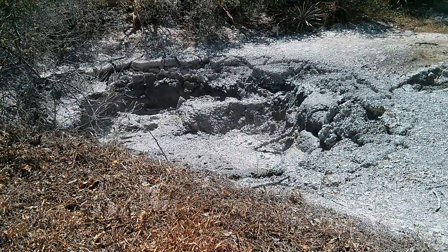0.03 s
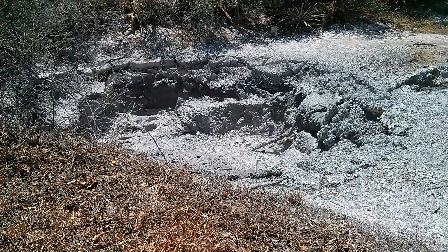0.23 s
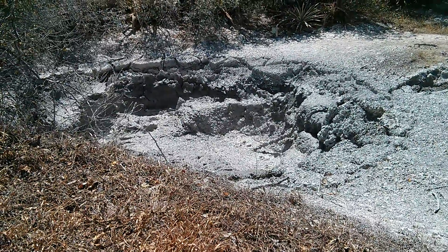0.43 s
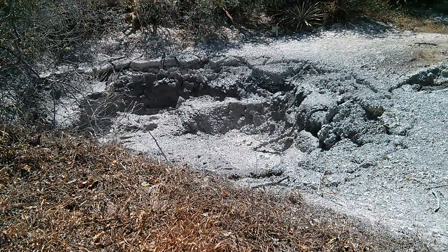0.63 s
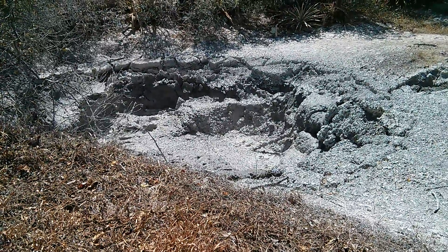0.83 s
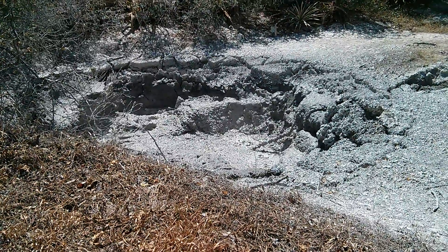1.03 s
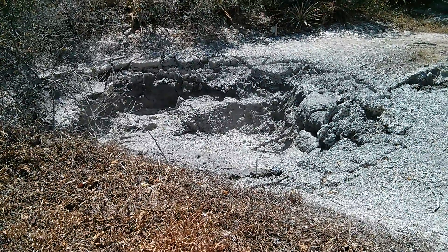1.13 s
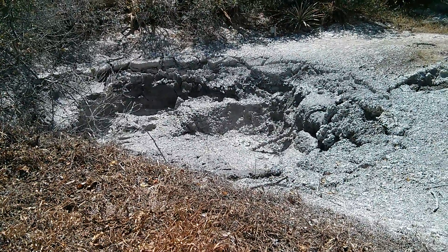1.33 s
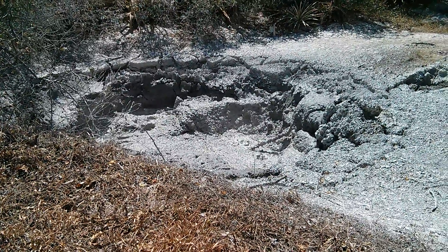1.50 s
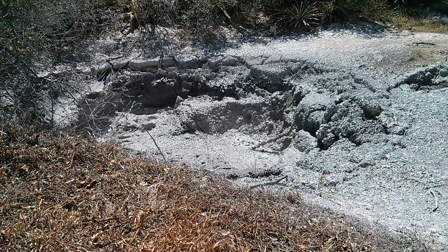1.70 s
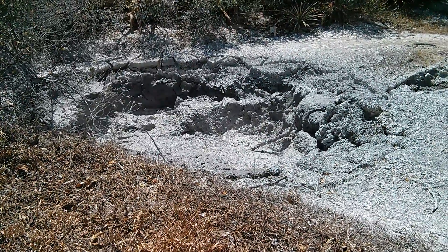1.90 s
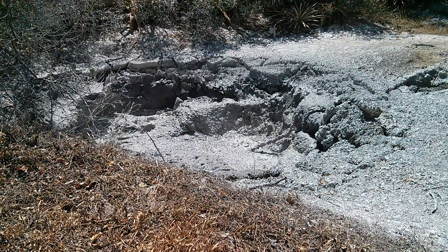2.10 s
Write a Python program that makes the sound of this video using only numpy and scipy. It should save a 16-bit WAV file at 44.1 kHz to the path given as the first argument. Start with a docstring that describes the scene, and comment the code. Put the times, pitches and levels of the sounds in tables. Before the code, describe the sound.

Boiling mud hisses with steam and simmers faintly outdoors. From 0.2 to 0.45 seconds a heavy cluster of low plops bursts with a hollow rumble, squelches and sharp splatter. A plop and pop follow near 0.78, then plops at 1.0 to 1.1 and a wet snap at 1.14. A faint upward slurp comes at 1.5, rounder plops at 1.7 and 1.85, and a small crisp spatter around 2.0 to 2.1.

```python
"""Boiling mud pit

Outdoors, with the microphone a few metres from the pit. Gas bubbles open with low plops, sines that mostly
glide up; wet films squelch as sliding tones and noise bands, and one snaps as a set of modes. A big burst early
on rings the vent with noise and clear tones, and throws a spray of random impacts. Steam is coloured noise,
hissing steadily and in puffs, over a simmer of small rising sines. The pit walls add a short echo."""
import sys
import numpy as np
from scipy import signal
from scipy.fft import rfft, irfft
from scipy.io import wavfile

SR = 44100
rng = np.random.default_rng(int(sys.argv[2]) if len(sys.argv) > 2 else 0)


def store_wav(level_fs):
    """Save 16-bit WAV to argv[1]."""
    pcm = np.round(np.clip(np.atleast_2d(level_fs), -1, 1) * 32767)
    wavfile.write(sys.argv[1], SR, pcm.T.astype(np.int16))


N = 94815
T = np.arange(N) / SR
GLIDE_S = 0.0137  # time constant of the pitch glide of plops and squelches


def undb(db):
    """Decibels to gain."""
    return 10 ** (np.asarray(db) / 20)


def unit(x):
    """Scale to rms 1."""
    return x / np.sqrt(np.mean(x ** 2))


def noise():
    """White noise, spread 1."""
    return rng.standard_normal(N)


def low_pass(x, order, hz):
    """Remove what lies above a corner frequency."""
    return signal.sosfilt(signal.butter(order, hz, fs=SR, output="sos"), x)


def colour(x, points):
    """Filter by a (hz, level_db) curve that falls 30 dB per octave beyond its ends; rms 1."""
    hz, db = np.array(points, float).T
    octave = np.log2(np.arange(N // 2 + 1) * SR / N + 1)
    below = np.maximum(np.log2(hz[0]) - octave, 0)
    above = np.maximum(octave - np.log2(hz[-1]), 0)
    gain = undb(np.interp(octave, np.log2(hz), db) - 30 * (below + above))
    return unit(irfft(rfft(x) * gain, N))


def ring(x, hz, width_hz):
    """One resonance, gain 1 at its centre."""
    return signal.lfilter(*signal.iirpeak(hz, hz / width_hz, fs=SR), x)


def envelope(start, swell, decay):
    """A rounded rise, then an exponential fall."""
    age = np.maximum(T - start, 0)
    rise = np.sin(np.pi / 2 * np.minimum(age / swell, 1))
    return rise * np.exp(-np.maximum(age - swell, 0) / decay)


def strength(events):
    """Envelopes of (start_s, level_db, swell_s, decay_s) rows, summed in power."""
    power = sum((undb(db) * envelope(start, swell, decay)) ** 2 for start, db, swell, decay in events)
    return np.sqrt(power)


def glide(start, from_hz, to_hz):
    """Phase of a cavity whose pitch settles exponentially from one value towards another."""
    age = np.maximum(T - start, 0)
    return 2 * np.pi * (to_hz * age + (from_hz - to_hz) * GLIDE_S * (1 - np.exp(-age / GLIDE_S)))


def wander(rate_hz):
    """Smooth chance with spread 1."""
    return unit(low_pass(noise(), 2, rate_hz))


def rasp(phase, width_hz):
    """A band of noise around a moving pitch; rms 1."""
    in_phase, quadrature = [unit(low_pass(noise(), 4, width_hz / 2)) for _ in range(2)]
    return in_phase * np.sin(phase) + quadrature * np.cos(phase)


def drops():
    """Dense droplet impacts of uneven size, at random moments."""
    drops_per_s, spread_db = 6400, 4
    hit = rng.random(N) < drops_per_s / SR
    size = undb(spread_db * np.minimum(rng.exponential(size=N), 2))
    return hit * noise() * size


def air():
    """Dull outdoor background: coloured noise whose level wavers slightly."""
    # spectrum of the open air: hz, level_db
    air_colour = [(25, 15), (50, -3.5), (90, 2), (140, -2), (220, -3.5), (310, 0.5), (430, -8.5),
                  (600, 0.5), (780, -10), (1000, -9.5), (1500, -9.5), (2250, -13.5), (2550, -18),
                  (2730, -36.5), (3200, -26.5)]
    level_db, waver_db, waver_hz = -53, 0.62, 12.5
    return undb(level_db) * colour(noise(), air_colour) * undb(waver_db * wander(waver_hz))


def steam():
    """Turbulent steam as noise: a steady, slightly flickering hiss that swells in puffs."""
    # spectrum of the steam: hz, level_db
    steam_colour = [(1650, -49), (2500, -23), (2800, -27), (3400, -32), (3600, -23.5), (4550, -17),
                    (4930, -17.5), (5690, -21.5), (6680, -9), (7600, -2), (8000, -1.5), (8540, -7),
                    (9050, -10.5), (10200, -6), (12200, -22), (13800, -22), (15100, -25), (15800, -21)]
    # steady hiss, ahead of the spray's colouring: time_s, level_db
    hiss_levels = [(0, -47.5), (.06, -52), (.14, -47.5), (.65, -53.5), (.95, -50), (1.05, -57),
                   (1.15, -48.5), (1.4, -51), (1.7, -52), (1.79, -54), (1.97, -54.5), (2.15, -46.5)]
    # puffs of steam, ahead of the spray's colouring: start_s, level_db, swell_s, decay_s
    puff_events = [(.16, -44, 0.14, 0.32), (.40, -36.5, 0.071, 0.038), (.72, -48, 0.083, 0.15),
                   (1.17, -62, 0.076, 0.049), (1.435, -52, .015, 0.036), (1.572, -43.5, 0.028, 0.04),
                   (1.812, -43, 0.033, 0.045), (2.008, -43.5, 0.026, 0.019), (2.09, -58, 0.015, .06)]
    flicker_db, flicker_hz = 1.0, 38
    steady = undb(np.interp(T, *np.array(hiss_levels).T))
    level = np.hypot(steady, strength(puff_events))
    return colour(noise(), steam_colour) * level * undb(flicker_db * wander(flicker_hz))


def simmer():
    """Small bubbles ring at random; the higher, the shorter, and above the middle pitch the quieter."""
    bubbles_per_s, middle_hz, range_octaves = 70, 502.7, 1.706  # range to either side
    level_db, range_db, tilt_db_per_octave = -55.5, 8, -6
    peak_cycles, rise_ratio = 2.4, 1.3  # cycles of starting pitch until loudest; final over starting pitch
    out, age = np.zeros(2 * N), T[:N // 16]
    for when, pitch, size in rng.random((int(bubbles_per_s * N / SR), 3)):
        octave = range_octaves * (2 * pitch - 1)
        hz = middle_hz * 2 ** octave
        life = age * hz / peak_cycles
        rising_hz = hz * (rise_ratio + (1 - rise_ratio) * np.exp(-life / 2))
        phase = 2 * np.pi * np.cumsum(rising_hz) / SR
        db = level_db + tilt_db_per_octave * max(octave, 0) + range_db * (2 * size - 1)
        i = int(when * N)
        out[i:i + len(age)] += undb(db) * life * np.exp(1 - life) * np.sin(phase)
    return out[:N]


def squelches():
    """Tearing films, and the vent's clear rings after gas bursts: a resonance that slides, mostly upward, from
    a clear ring to a rough rasp by event."""
    # wet films, and at .318-.344 s the vent ringing clearly after gas bursts: start_s, start_pitch_hz,
    # end_pitch_hz, level_db, swell_s, decay_s, roughness (0-1)
    squelch_events = [(.002, 540, 608, -45.5, 0.0063, 0.021, 0.74), (.072, 594, 676, -46.5, 0.013, 0.009, 0.6),
                      (.203, 550, 630, -44, 0.0026, 0.0054, 0.7), (.237, 650, 730, -34.5, 0.0039, 0.0054, 0.5),
                      (0.242, 1600, 1910, -42.5, 0.0024, 0.01, 0.95),
                      (.2515, 553, 742, -31.5, 0.0049, 0.014, 0.65), (0.285, 348, 413, -33, .002, 0.0034, 0.1),
                      (.318, 1182, 1205, -29.5, 0.004, 0.0044, 0.3),
                      (.340, 1166, 1184, -28.5, 0.006, 0.0041, 0.23),
                      (.344, 942, 962, -32.5, 0.0046, .013, 0.07),
                      (0.395, 1420, 1400, -34, 0.0047, 0.0044, 0.35),
                      (1.083, 436, 560, -41, 0.0017, 0.008, 0.9),
                      (1.2135, 1525, 1570, -42, 0.0015, 0.012, 0.8),
                      (1.265, 1300, 1440, -38.5, 0.003, 0.0061, 0.5),
                      (1.446, 250, 393, -40, 0.0062, 0.011, 0.8), (1.498, 301, 462, -39, .007, 0.021, 0.76),
                      (1.723, 355, 426, -40.5, 0.0079, 0.016, 0.77),
                      (1.85, 615, 647, -47, 0.0012, 0.0097, 0.77),
                      (1.757, 480, 760, -49.5, 0.006, 0.012, 0.88),
                      (1.972, 1185, 1260, -45.5, 0.0035, 0.0054, 0.65),
                      (2.008, 480, 559, -46.5, .004, 0.037, 0.85),
                      (2.012, 2035, 2103, -50.5, 0.0045, 0.018, 0.86)]
    rasp_width_hz = 255
    out = np.zeros(N)
    for start, from_hz, to_hz, db, swell, decay, rough in squelch_events:
        phase = glide(start, from_hz, to_hz)
        clear = np.sqrt(2 * (1 - rough ** 2)) * np.sin(phase)
        tone = clear + rough * rasp(phase, rasp_width_hz)
        out += undb(db) * envelope(start, swell, decay) * tone
    return out


def plops():
    """Each big bubble rings briefly as its pitch glides, and falls silent as it collapses."""
    # big bubbles: start_s, start_pitch_hz, end_pitch_hz, level_db, swell_s, life_s
    bubble_events = [(.027, 212, 310, -38.5, 0.0047, 0.017), (0.164, 228, 376, -38.5, 0.0017, 0.034),
                     (0.197, 112, 120, -31, .006, 0.023), (0.2085, 119, 128, -18.5, 0.0059, 0.016),
                     (0.224, 250, 340, -30, 0.0045, 0.015), (0.2366, 139, 154, -19.5, 0.0017, 0.042),
                     (0.2722, 313, 356, -17, 0.0051, 0.016), (0.3191, 115, 115, -14.5, 0.0036, 0.032),
                     (0.3466, 84.5, 106, -18.5, 0.013, 0.059), (0.385, 244, 317, -30, 0.0059, 0.021),
                     (0.417, 256, 346, -33, 0.0033, 0.018), (0.552, 208, 349, -34.5, 0.0098, 0.016),
                     (0.718, 89, 98, -41, 0.0042, 0.038), (0.7609, 260, 388, -22, 0.0052, 0.016),
                     (.776, 365, 404, -36, 0.003, 0.034), (0.8164, 143, 172, -34, 0.0098, 0.016),
                     (.855, 462, 527, -47.5, 0.0028, 0.054), (0.8865, 270, 308, -34, 0.0023, 0.009),
                     (.942, 220, 258, -39, 0.0046, 0.059), (1.01, 119, 244, -24.5, 0.0046, 0.014),
                     (1.021, 220, 320, -25.5, 0.0045, 0.036), (1.0858, 143, 151, -23, 0.0026, 0.024),
                     (1.114, 230, 370, -39, 0.002, 0.034), (1.146, 145, 157, -31, 0.0019, 0.011),
                     (1.6847, 125, 248, -23, 0.006, 0.0168), (1.6957, 215, 315, -26, 0.006, 0.038),
                     (1.726, 295, 377, -19.5, 0.0027, 0.011), (1.738, 423, 535, -39.5, 0.0013, 0.033),
                     (1.85, 196, 249, -19, 0.0029, 0.015), (1.8575, 249, 338, -25, 0.0039, 0.037),
                     (1.926, 235, 323, -36, 0.0026, 0.013), (2.039, 99, 124, -40.5, 0.0077, 0.025)]
    overtone_db, collapse_power = -35, 1.78
    out = np.zeros(N)
    for start, from_hz, to_hz, db, swell, life in bubble_events:
        phase = glide(start, from_hz, to_hz)
        opening = np.sin(np.pi / 2 * np.clip((T - start) / swell, 0, 1))
        remaining = np.clip((start + life - T) / max(life - swell, 1 / SR), 0, 1)
        tone = np.sin(phase) + undb(overtone_db) * np.sin(2 * phase)
        out -= undb(db) * opening * remaining ** collapse_power * tone
    return out


def heaves():
    """Heaving and slumping mud: a dull rumble of low noise."""
    # movements of the mud: start_s, level_db, swell_s, decay_s
    heave_events = [(.19, -35, 0.018, 0.092), (.335, -31.5, 0.011, 0.042), (.8, -47, 0.012, 0.14),
                    (2.0, -44.5, 0.031, 0.043)]
    # spectrum of the rumble: hz, level_db
    heave_colour = [(48, -8), (66, 2), (95, -7), (130, -1), (280, -10), (400, -14), (600, -26.5)]
    return colour(noise(), heave_colour) * strength(heave_events)


def bursts():
    """Escaping gas rings the hollow of the vent; the soft mud swallows the treble."""
    # gas bursting through, ahead of the treble loss: start_s, level_db, swell_s, decay_s
    burst_events = [(.241, -41, 0.0013, 0.0051), (.271, -29.5, 0.0036, 0.009), (.285, -42, 0.0014, .004),
                    (.317, -34.5, 0.0012, 0.013), (.340, -37, 0.0043, 0.008), (.388, -36.5, 0.0075, 0.026),
                    (1.0835, -47, 0.001, 0.0028)]
    # resonances of the vent: centre_hz, half_width_hz (to 6 dB down), level_db
    vent_modes = [(550, 14, -13), (685, 93, -5.5), (933, 40, 0), (1194, 26, -2.5), (1310, 510, -14)]
    top_hz = 1390
    gas = noise()
    hollow = np.zeros(N)
    for hz, half_width, db in vent_modes:
        once = ring(gas, hz, 2 * half_width)
        hollow += undb(db) * ring(once, hz, 2 * half_width)
    return low_pass(unit(hollow) * strength(burst_events), 6, top_hz)


def smacks():
    """Thin skins of mud part with a short wet click of noise."""
    # parting skins: start_s, level_db, swell_s, decay_s
    smack_events = [(.249, -46, 0.00055, 0.0053), (1.728, -48.5, 0.0016, 0.0034),
                    (1.853, -48.5, 0.0014, 0.0048), (2.015, -49, .002, .005), (2.037, -42.5, 0.0024, .004)]
    # spectrum of the click: hz, level_db
    smack_colour = [(900, -14), (1450, 3), (1780, -10), (2100, 0), (2450, -7.5), (2750, -34), (3100, -50)]
    return colour(noise(), smack_colour) * strength(smack_events)


def splatter():
    """Thrown mud: showers of droplet impacts, and lone sharp pops of noise."""
    # showers, ahead of the spray's colouring: start_s, level_db, swell_s, decay_s
    splat_events = [(.251, -37, 0.0028, 0.017), (.274, -38, 0.0024, 0.011), (.285, -33.5, 0.0013, 0.014),
                    (.316, -37.5, 0.00069, 0.04), (.3435, -27, 0.0016, 0.01), (.381, -33, 0.0046, .006),
                    (.3855, -22.5, 0.0063, 0.0033), (.394, -23.5, 0.0026, 0.010),
                    (.415, -32, 0.0068, 0.032), (.464, -35, 0.0058, 0.041), (1.083, -44, 0.0022, 0.015),
                    (1.15, -46.5, 0.0021, 0.084), (1.212, -43, 0.0033, 0.027), (1.325, -45, 0.0033, 0.015),
                    (1.85, -54, 0.003, 0.0086), (2.011, -49, 0.0062, 0.015), (2.0375, -47.5, 0.002, 0.027)]
    # spectrum of the showers: hz, level_db
    splat_colour = [(180, -44), (300, -4), (391, 4.5), (527, -45), (676, -4.5), (798, -33), (958, -17),
                    (1330, -0.5), (1700, -14), (1890, -6.5), (2450, -18.5), (2800, -26), (3250, -38),
                    (3450, -41), (3570, -12.5), (4300, -14.5), (4950, -10), (5740, -22), (6560, -5.5),
                    (7870, 1), (9140, -10), (10100, -4.5), (12100, -17), (15000, -22), (15800, -27)]
    # lone pops, ahead of the spray's colouring: start_s, level_db, decay_s
    pop_events = [(0.3462, -25.5, 0.002), (.782, -31.5, 0.0019), (2.0961, -30.5, 0.0039)]
    # spectrum of the pops: hz, level_db
    pop_colour = [(3000, -43), (6000, -34), (7500, 11.5), (10500, -5.5), (12500, -9), (15800, -17)]
    pop_swell_s = 0.00062
    pops = sum(undb(db) * envelope(start, pop_swell_s, decay) for start, db, decay in pop_events)
    return colour(drops(), splat_colour) * strength(splat_events) + colour(noise(), pop_colour) * pops


def spray():
    """Splatter and steam together, coloured by narrow resonances."""
    # resonances added to the spray: centre_hz, width_hz, level_db
    spray_rings = [(5060, 160, -3.5), (6710, 40, -1.5), (7150, 61, -4), (7670, 22, -8.5), (8220, 42, 1.5),
                   (9440, 70, -17), (9970, 66, -10)]
    plain = undb(-1.0) * (splatter() + steam())
    return plain + sum(undb(db) * ring(plain, hz, width) for hz, width, db in spray_rings)


def snap():
    """A taut film rips open unevenly; the quick upward sweep sets off the low modes first."""
    # modes of the snapping bubble: pitch_hz, level_db, swell_s, decay_s
    snap_modes = [(662, -27.5, 0.0011, 0.0041), (1180, -40.5, 0.0018, 0.023), (1243, -24.5, 0.0012, 0.0036),
                  (1374, -31, 0.00094, 0.0057), (1805, -42, .002, 0.0057), (2180, -34, 0.0037, 0.0031),
                  (5120, -29.5, 0.0012, 0.0043), (6300, -32, 0.0029, 0.0044), (7200, -37, .002, 0.0034),
                  (7670, -34, 0.0019, 0.0044)]
    snap_s, sweep_hz_per_s = 1.1428, 2000000
    unevenness = 0.31  # spread of phase in radians, and of level as a share
    out = np.zeros(N)
    for hz, db, swell, decay in snap_modes:
        start = snap_s + hz / sweep_hz_per_s
        tone = np.sin(2 * np.pi * hz * (T - start) + unevenness * wander(370))
        out -= undb(db) * envelope(start, swell, decay) * tone * (1 + unevenness * wander(360))
    return out


def slurp():
    """Gas pushes through a closing gap: a broad, fuzzy resonance that sweeps upward."""
    # path of the sweep: time_s, centre_hz, level_db
    slurp_path = [(1.497, 550, -54), (1.512, 900, -47.5), (1.525, 1296, -42), (1.538, 1656, -44.5),
                  (1.55, 1950, -57)]
    width_hz = 630
    when, hz, db = np.array(slurp_path).T
    phase = 2 * np.pi * np.cumsum(np.interp(T, when, hz)) / SR
    return np.interp(T, when, undb(db), left=0, right=0) * rasp(phase, width_hz)


def mist():
    """The finest spray, blown out with some puffs: droplet impacts as a very high fizz."""
    # breaths of mist: start_s, level_db, swell_s, decay_s
    mist_events = [(1.53, -53.5, 0.073, 0.04), (1.82, -54, 0.022, 0.032), (2.01, -55, .015, 0.067)]
    # spectrum of the mist: hz, level_db
    mist_colour = [(8000, -19), (10500, 7), (13000, -1), (15800, -1)]
    return colour(drops(), mist_colour) * strength(mist_events)


def pit(x):
    """The pit walls return one echo from the near side and a short scattered tail."""
    wall_s, wall_db = .0063, -18.5
    tail_db, tail_decay_s = -21, .03
    age = T[:N // 8]
    tail = rng.standard_normal(len(age)) * np.exp(-age / tail_decay_s) * (age > wall_s)
    scattered = signal.fftconvolve(x, tail / np.linalg.norm(tail))[:N]
    echo = np.interp(T - wall_s, T, x, left=0)
    return x + undb(wall_db) * echo + undb(tail_db) * scattered


def scene():
    """Bubbles and films echo in the pit; rumble, spray, mist, simmer and outdoor air reach us directly."""
    in_pit = plops() + squelches() + slurp() + smacks() + bursts() + snap()
    mix = pit(in_pit) + heaves() + mist() + spray() + air() + simmer()
    return mix[None]  # one channel


def record(dry):
    """The microphone thins the deepest bass and cuts the top."""
    bass_hz, top_hz = 43, 15850
    bass_cut = signal.butter(3, bass_hz, "high", fs=SR, output="sos")
    thin = signal.sosfiltfilt(bass_cut, dry, padtype="even", padlen=N // 10)
    return signal.sosfilt(signal.ellip(10, .2, 80, top_hz, fs=SR, output="sos"), thin)


dry = scene()
out = record(dry)
store_wav(out)
```